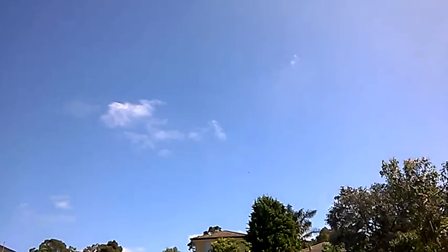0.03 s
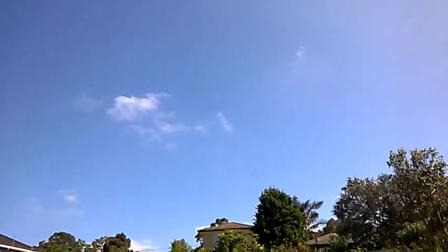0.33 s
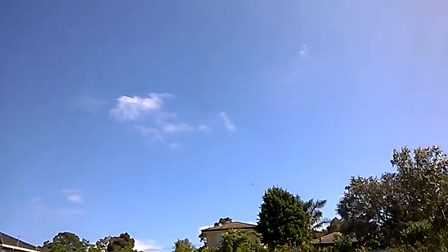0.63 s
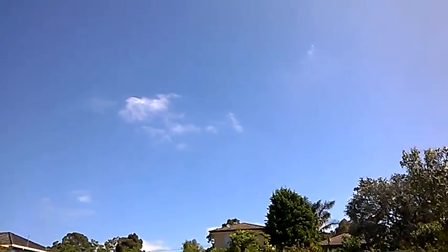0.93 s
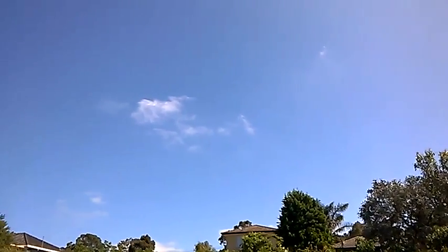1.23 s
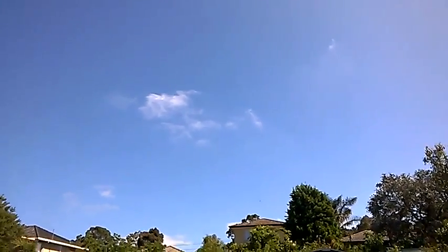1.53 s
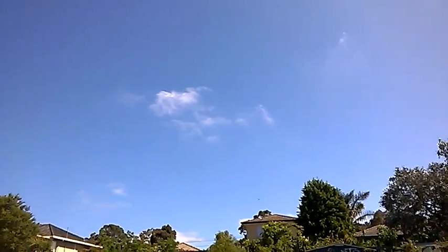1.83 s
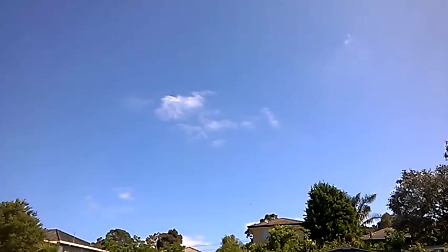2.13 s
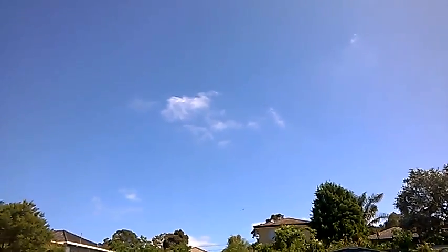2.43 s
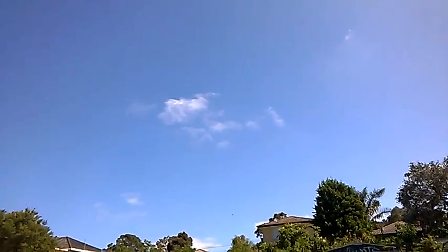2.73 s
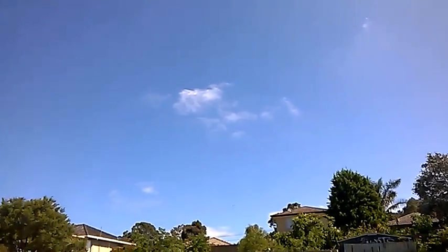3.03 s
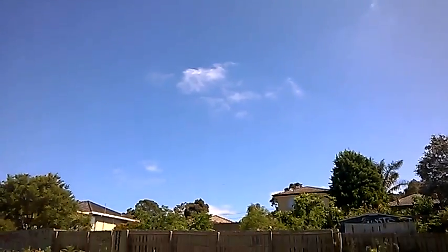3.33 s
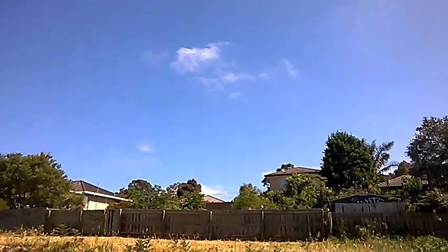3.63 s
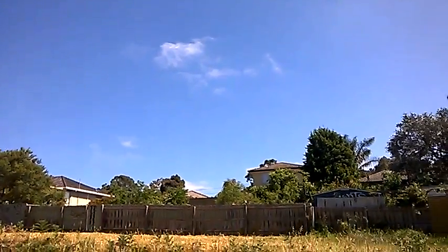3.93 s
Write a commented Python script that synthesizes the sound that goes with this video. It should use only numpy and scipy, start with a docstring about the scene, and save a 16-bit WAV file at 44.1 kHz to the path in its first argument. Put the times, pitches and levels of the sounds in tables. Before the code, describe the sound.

A bird gives four clear, arched calls over strong wind rumbling on the microphone.

```python
"""Bird calls in a gusty garden

A bird gives four clear, arched calls, harmonic tones shaped by its throat; a second one answers
farther off. Faint falling whistles come first. Houses and trees return a faint echo. Gusts buffet
the microphone with a lumpy low rumble. The recorder opens with a tick and fades in over a thin hiss."""
import sys
import numpy as np
from scipy import signal
from scipy.fft import rfft, irfft
from scipy.io import wavfile
from scipy.ndimage import uniform_filter1d, minimum_filter1d

SR = 44100
rng = np.random.default_rng(int(sys.argv[2]) if len(sys.argv) > 2 else 0)


def inscribe(sig):
    """Save sig as 16-bit PCM at rate SR to the path in sys.argv[1].

    A 1-D sig is mono; a 2-D sig holds one channel per row.
    Samples are clipped to [-1, 1] before scaling.
    """
    pcm = np.round(np.clip(np.atleast_2d(sig).T, -1, 1) * 32767)
    wavfile.write(sys.argv[1], SR, pcm.astype(np.int16))


N = 176400


def amp(db):
    """Decibels to gain."""
    return 10 ** (np.asarray(db) / 20)


def unit_rms(x):
    """Scales to rms 1."""
    return x / np.sqrt(np.mean(x ** 2) + 1e-20)


def curve_at(points, hz):
    """Interpolates on a log-frequency axis."""
    point_hz, value = np.transpose(points)
    return np.interp(np.log(hz + 1), np.log(point_hz + 1), value)


def add(mix, start_s, sound):
    """Mixes a sound in at start_s."""
    part = mix[max(round(start_s * SR), 0):][:len(sound)]
    part += sound[:len(part)]


def noise(spectrum):
    """Shaped noise, rms 1."""
    shape = amp(curve_at(spectrum, np.fft.rfftfreq(N, 1 / SR)))
    return unit_rms(irfft(rfft(rng.standard_normal(N)) * shape, N))


def wander(rate_hz, size=N):
    """Smooth random motion up to about rate_hz, rms 1."""
    lowpass = np.exp(-(np.fft.rfftfreq(size, 1 / SR) / rate_hz) ** 2)
    return unit_rms(irfft(rfft(rng.standard_normal(size)) * lowpass, size))


def steadied(x, size=2200):
    """Evens out the slow swells of a noise."""
    return x / np.sqrt(abs(uniform_filter1d(x ** 2, size)) + 0.014)


# Hiss spectrum: (frequency [Hz], relative level [dB])
AIR_SPECTRUM = [(40, -2), (500, -5.5), (1000, -2.5), (1900, -7), (2800, -17.5), (4300, -17.5),
                (6000, -25.5), (8400, -29.5), (10000, -22.5), (12000, -16.5), (15800, -20.5)]


def air(level_db=-55.5):
    """Steady outdoor air and microphone hiss."""
    return amp(level_db) * noise(AIR_SPECTRUM)


# Gust strength: (time [s], rumble level [dB], relative flutter level [dB])
GUSTS = [(0.15, -41, -89), (0.22, -28, -48), (0.41, -27.5, -43.5), (0.59, -35.5, -55), (0.62, -30, -42),
         (0.74, -26.5, -54), (0.82, -46, -50.5), (0.87, -22.5, -45), (1.01, -40, -54), (1.08, -25.5, -46),
         (1.2, -38, -58), (1.29, -24, -62), (1.35, -37, -24), (1.37, -34, -52), (1.47, -20, -37.5),
         (1.64, -23.5, -45), (1.75, -19.5, -50.5), (1.79, -6.5, -20.5), (1.82, -17.5, -35),
         (1.85, -14.5, -22), (1.9, -23.5, -46), (1.94, -20.5, -31.5), (2.06, -27.5, -46),
         (2.13, -12.5, -29), (2.23, -16.5, -36), (2.26, -27.5, -28.5), (2.27, -29, -56), (2.32, -17, -27),
         (2.37, -20.5, -39), (2.39, -21, -17), (2.42, -33.5, -57), (2.45, -23, -15.5), (2.51, -22.5, -47),
         (2.6, -31.5, -52), (2.62, -32, -36), (2.66, -28, -55.5), (2.91, -16.5, -30), (3.04, -28, -47),
         (3.07, -24, -22.5), (3.1, -19.5, -48), (3.14, -22, -26), (3.23, -24.5, -39.5), (3.24, -20, -36),
         (3.27, -24.5, -47.5), (3.31, -16, -18.5), (3.36, -25.5, -42.5), (3.42, -29, -75),
         (3.45, -12.5, -35), (3.52, -26, -48), (3.58, -9, -31.5), (3.65, -22.5, -36), (3.67, -34.5, -58.5),
         (3.81, -29.5, -60), (3.89, -20, -29.5), (3.9, -21, -67.5), (4.0, -12, -19.5)]
# Low rumble and midrange flutter spectra: (frequency [Hz], relative level [dB])
RUMBLE_SPECTRUM = [(15, -23.5), (30, -11), (60, -3), (105, 2), (190, -4.5), (300, -11), (420, -20.5),
                   (700, -51.5), (1500, -76.5)]
FLUTTER_SPECTRUM = [(120, -22.5), (250, -0.5), (400, -1), (600, -10.5), (900, -21.5), (1300, -32),
                    (2000, -45.5), (4000, -77), (8000, -93)]


def wind(lump_hz=55, rumble_lump_db=3.5, flutter_lump_db=5.5):
    """Turbulence at the microphone: rumble and flutter share the same quick lumps."""
    gust_s, rumble_db, flutter_db = np.transpose(GUSTS)
    t = np.arange(N) / SR
    lumps = np.clip(wander(lump_hz), -2, 2)
    rumble = unit_rms(steadied(noise(RUMBLE_SPECTRUM)) * amp(rumble_lump_db * lumps))
    flutter = unit_rms(steadied(noise(FLUTTER_SPECTRUM)) * amp(flutter_lump_db * lumps))
    rumble *= amp(np.interp(t, gust_s, rumble_db))
    flutter *= amp(np.interp(t, gust_s, flutter_db) + 1.5)
    return rumble + flutter


# Eddy strikes: (time [s], relative snap level [dB], relative push level [dB])
EDDIES = [(0.355, -23, -18), (0.412, -38, -9.5), (0.479, -41, -17.5), (0.531, -33, -31), (0.614, -29, -14),
          (0.643, -33, -21), (0.667, -19.5, -15.5), (0.723, -35, -20.5), (0.746, -33, -17),
          (0.784, -27.5, -30), (0.988, -30, -22), (1.099, -33, -18.5), (1.248, -29.5, -21),
          (1.293, -30, -7), (1.329, -19, -11.5), (1.428, -37, -17), (1.793, -16.5, -13),
          (1.836, -25.5, -12.5), (1.85, -20.5, -11.5), (1.939, -21, -14.5), (2.131, -24, -22),
          (2.216, -26.5, -11.5), (2.381, -26, -11), (2.391, -8, -42), (2.433, -20, -35), (2.449, -15, -33),
          (2.462, -6, -10), (2.617, -20.5, -23), (2.778, -16.5, -11), (2.834, -12.5, -8.5),
          (2.898, -23, -35), (2.925, -14.5, -7.5), (2.984, -44, -12.5), (3.061, -13.5, -14.5),
          (3.141, -12.5, -13), (3.157, -7.5, -8), (3.204, -17, -21), (3.237, -18.5, -10),
          (3.303, -10.5, -16), (3.451, -10.5, -25.5), (3.533, -32.5, -15), (3.57, -16.5, -5.5),
          (3.58, -14.5, -15), (3.609, -12, -11), (3.636, -28, -8), (3.697, -46, -17), (3.883, -13.5, -13),
          (3.922, -20, -14), (3.968, -11.5, -11)]


def eddies(snap_s=.00049, push_s=.0014, lag_s=.00315, wake_rise_s=.002, wake_fall_s=.0084):
    """Each eddy hits the microphone: a sharp pressure swing on a slower push, with a ragged wake."""
    pressure, wake = np.zeros((2, N))
    t = np.arange(N) / SR
    for time_s, snap_db, push_db in EDDIES:
        span = abs(t - time_s) < .05
        age_s = t[span] - time_s - lag_s
        snap = age_s / (snap_s * np.exp(.13 * rng.standard_normal()))
        push = age_s / (push_s * np.exp(.23 * rng.standard_normal()))
        pressure[span] += amp(snap_db + 8) * snap * np.exp(-snap ** 2 / 2) * rng.choice([-1, 1])
        pressure[span] -= amp(push_db + 3.5) * (1 - push ** 2) * np.exp(-push ** 2 / 2)
        width_s = np.where(age_s < 0, wake_rise_s, wake_fall_s)
        wake[span] += amp(snap_db - 11.5) * np.exp(-(age_s / width_s) ** 2 / 2)
    return pressure + wake * steadied(noise(FLUTTER_SPECTRUM), size=500)


# Tail decay: (frequency [Hz], T60 [s])
TAIL_DECAY = [(1000, .6), (3500, .9), (5000, .9), (7000, .5), (14000, .3)]
# Tail spectrum: (frequency [Hz], relative level [dB])
TAIL_SPECTRUM = [(1000, -6), (2500, -5), (3600, -1), (4900, 2), (6000, -6), (14000, -14)]


def garden_tail(x):
    """Trees and fences scatter sound into a thin diffuse tail."""
    hz, t, bins = signal.stft(rng.standard_normal(SR), SR, nperseg=256)
    tail_db = curve_at(TAIL_SPECTRUM, hz)[:, None] - 60 * t / curve_at(TAIL_DECAY, hz)[:, None]
    tail = signal.istft(bins * amp(tail_db), SR, nperseg=256)[1]
    return signal.fftconvolve(x, tail / np.linalg.norm(tail))[:N]


# Single echoes: (delay [s], gain [dB])
REFLECTIONS = [(.012, -25.5), (.034, -23)]


def echoes(x):
    """The surroundings return faint delayed copies."""
    mix = np.zeros(N)
    for delay_s, gain_db in REFLECTIONS:
        add(mix, delay_s, amp(gain_db) * x)
    return mix


# Whistles: (start [s], length [s], from [Hz], to [Hz], level [dB])
WHISTLES = [(0.536, .018, 5100, 3730, -65), (0.538, 0.034, 3940, 3230, -53),
            (0.683, 0.054, 2570, 2390, -66), (0.757, .025, 3000, 2310, -63), (1.147, .055, 2100, 1750, -61)]


def falling_whistles():
    """Faint falling whistles: short high chirps, then the falling end of a distant call."""
    mix = np.zeros(N)
    for start_s, length_s, from_hz, to_hz, level_db in WHISTLES:
        progress = np.arange(0, length_s, 1 / SR) / length_s
        hz = to_hz + (from_hz - to_hz) * (1 - progress) ** 1.1
        envelope = amp(level_db) * np.sqrt(2 * np.sin(np.pi * progress))
        add(mix, start_s, envelope * np.sin(2 * np.pi * np.cumsum(hz) / SR))
    return mix


def call(length_s, top_hz, top_at, gain_db, notch_db, rasp, throat, rise, sag, flick, waver_db):
    """A harmonic tone rises, sags and flicks down through throat resonances, hoarse near its top."""
    attack_s, release_s, flick_s = .06, .01, .006
    waver_hz, rasp_hz = 26, 420
    notch_hz, notch_width_hz = 5050, 130
    t = np.arange(0, length_s, 1 / SR)
    progress = t / length_s

    def drift(rate_hz):
        return wander(rate_hz, size=SR)[:len(t)]

    # rise, sag and flick are fractions of the top pitch
    before = np.maximum(1 - progress / top_at, 0)
    after = np.maximum((progress - top_at) / (1 - top_at), 0)
    closing = np.exp((t - length_s) / flick_s)
    hz = top_hz * (1 - rise * before ** 1.5 - sag * after ** 1.1 - flick * closing)
    hz *= (1 + .0025 * drift(rate_hz=210)) * (1 + .003 * drift(rate_hz=35))  # jitter, wobble
    phase = 2 * np.pi * np.cumsum(hz) / SR
    hoarseness = rasp * (.55 + np.exp(-((progress - .4) / .2) ** 2))
    tone = np.zeros(len(t))
    for k in range(1, 10):
        cut_db = notch_db * np.exp(-((k * hz - notch_hz) / notch_width_hz) ** 2)
        partial_db = curve_at(throat, k * hz) - cut_db + waver_db * drift(waver_hz)
        grit = (drift(rasp_hz) * np.sin(k * phase) + drift(rasp_hz) * np.cos(k * phase)) / np.sqrt(2)
        tone += amp(partial_db) * (np.sin(k * phase) + hoarseness * grit)
    envelope = np.minimum(t / attack_s, 1) * np.minimum((length_s - t) / release_s, 1)
    return np.sqrt(2) * amp(gain_db) * tone * envelope


# Far calls: (start [s], length [s], top pitch [Hz], top position [0-1], gain [dB],
# throat notch depth [dB], rasp [0-1])
FAR_CALLS = [(1.405, .25, 1058, .48, -61, 0, .25), (1.81, .25, 1160, .25, -60, 0, .3),
             (2.19, .235, 1200, .4, -63, 0, .3)]
# Throat resonances: (frequency [Hz], gain [dB])
FAR_THROAT = [(1000, -20), (2050, 1.5), (3100, -9.5), (4150, -1), (5200, -25), (6300, -14), (7300, -22.5),
              (8500, -45), (13000, -53)]


def far_bird():
    """Three faint, wavering calls with a deep sag in pitch."""
    mix = np.zeros(N)
    for start_s, *row in FAR_CALLS:
        add(mix, start_s, call(*row, FAR_THROAT, rise=.10, sag=.12, flick=.03, waver_db=4))
    return mix


# Near calls: (start [s], length [s], top pitch [Hz], top position [0-1], gain [dB],
# throat notch depth [dB], rasp [0-1])
NEAR_CALLS = [(1.762, .22, 1208, .38, -46, 1, .42), (2.085, .222, 1250, .52, -43, 28, .1),
              (2.508, .228, 1279, .41, -43.5, 9, .1), (2.93, .224, 1228, .49, -42.5, 0, .12)]
# Throat resonances: (frequency [Hz], gain [dB])
NEAR_THROAT = [(1200, -18.5), (2200, -8.5), (2500, -12), (3250, -9.5), (3500, -6), (3720, 0.5), (4300, 0.5),
               (4750, -6), (5400, -10.5), (6000, -14), (6600, -17), (7300, -18), (8300, -34.5), (9800, -33),
               (11200, -36), (13000, -59.5)]


def near_bird():
    """Four clear, arched calls, each closing with a sharp downward flick."""
    mix = np.zeros(N)
    for start_s, *row in NEAR_CALLS:
        add(mix, start_s, call(*row, NEAR_THROAT, rise=.135, sag=.062, flick=.17, waver_db=2))
    return mix


def scene():
    """Birds and their echoes over wind and hiss, in mono."""
    near = near_bird()
    far = far_bird() + falling_whistles()
    garden = echoes(near + far) + amp(-24) * garden_tail(near) + amp(-13) * garden_tail(far)
    return (near + far + garden + wind() + eddies() + air())[None]


# Opening tick spectrum: (frequency [Hz], relative level [dB])
TICK_SPECTRUM = [(40, 3), (600, -18), (2200, -14), (3200, -34), (8000, -40), (15000, -29)]


def record(dry):
    """The recorder ticks, fades in, softly limits the strongest gusts and cuts the top treble."""
    tick_start_s, tick_length_s, tick_db = .078, .013, -47.5
    fade_start_s, fade_length_s = .16, .33
    ceiling, cutoff_hz = .78, 15900
    t = np.arange(N) / SR
    tick_gate = (t > tick_start_s) & (t < tick_start_s + tick_length_s)
    fade = np.clip((t - fade_start_s) / fade_length_s, 0, 1)
    x = dry * fade + amp(tick_db) * noise(TICK_SPECTRUM) * tick_gate
    gain = minimum_filter1d(np.minimum(ceiling / (abs(x) + 1e-9), 1), size=301)
    smooth_gain = uniform_filter1d(uniform_filter1d(gain, size=151), size=151)
    lowpass = signal.firwin(511, cutoff_hz, window=("kaiser", 9), fs=SR)
    return signal.oaconvolve(x * smooth_gain, lowpass[None], "same")


dry = scene()
out = record(dry)
inscribe(out)
```